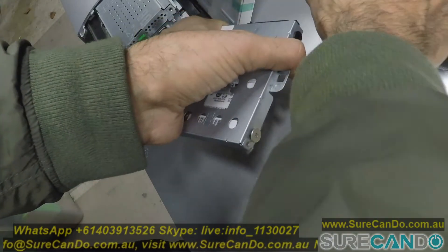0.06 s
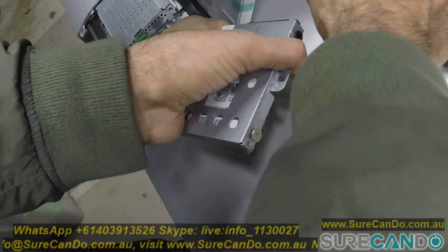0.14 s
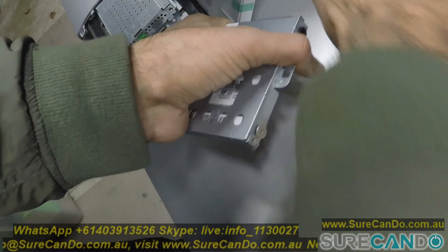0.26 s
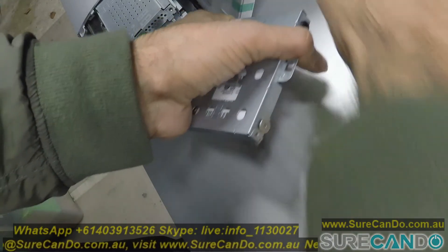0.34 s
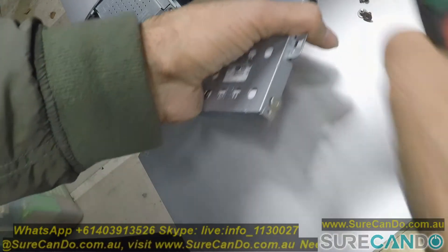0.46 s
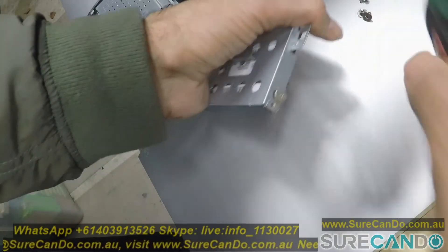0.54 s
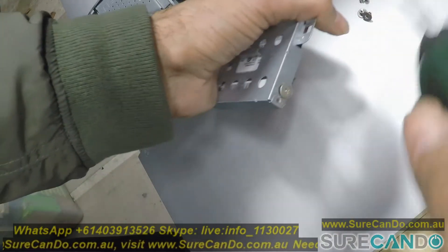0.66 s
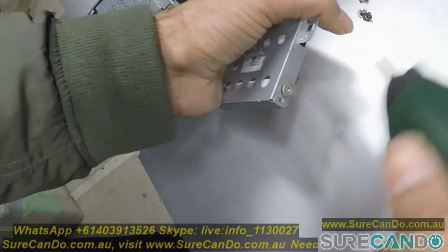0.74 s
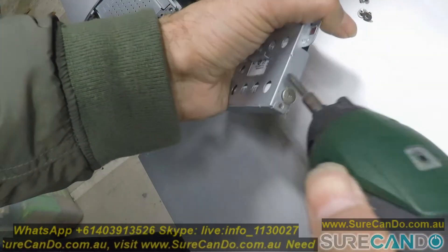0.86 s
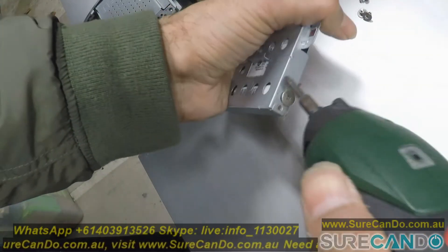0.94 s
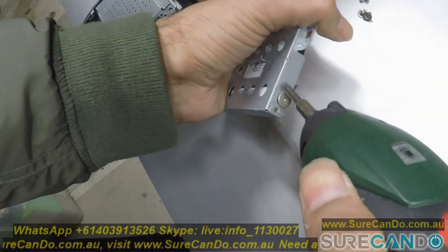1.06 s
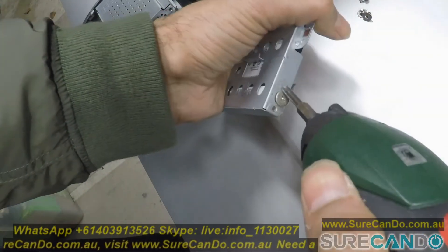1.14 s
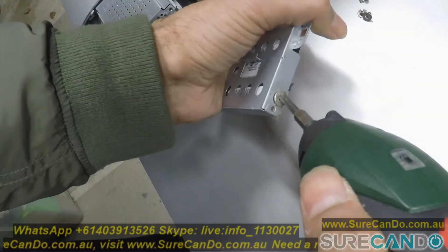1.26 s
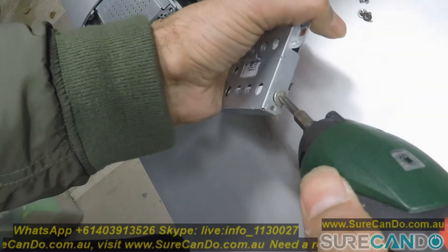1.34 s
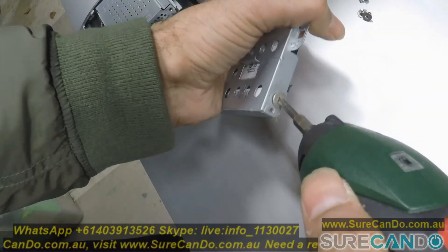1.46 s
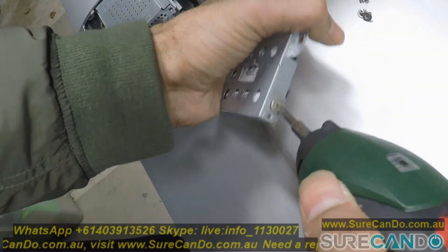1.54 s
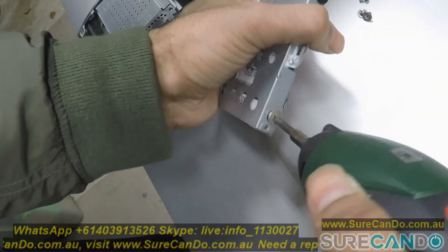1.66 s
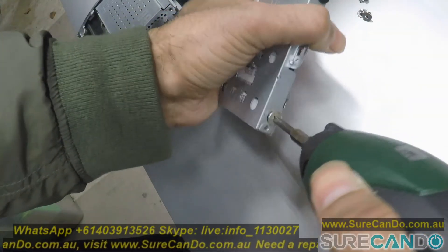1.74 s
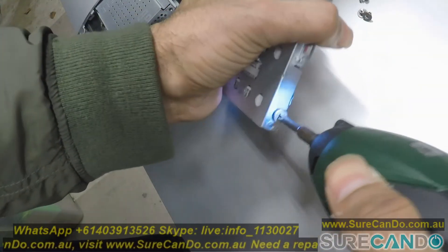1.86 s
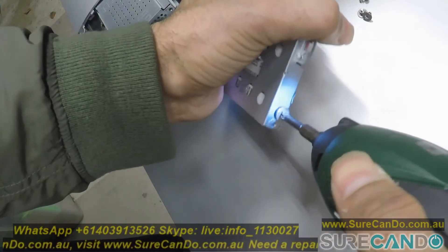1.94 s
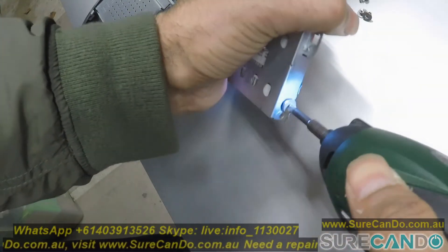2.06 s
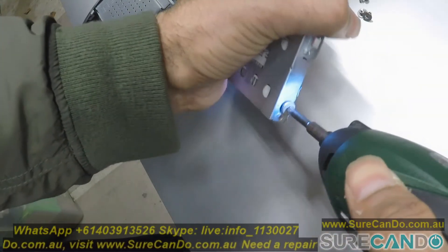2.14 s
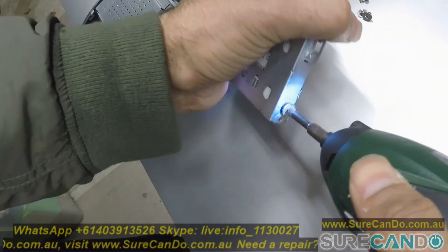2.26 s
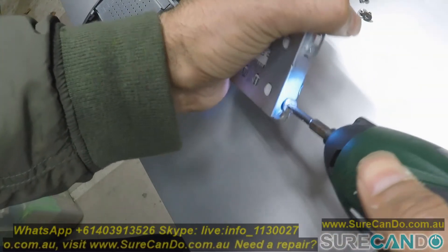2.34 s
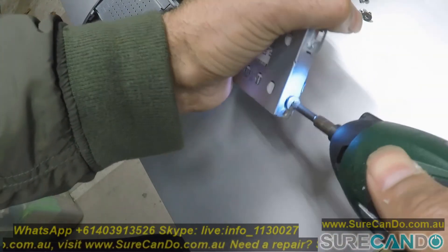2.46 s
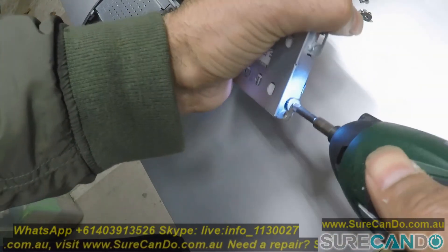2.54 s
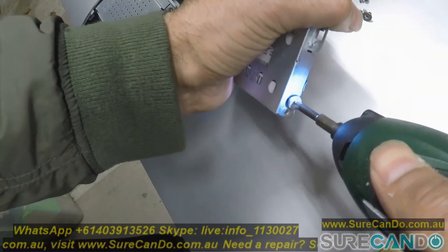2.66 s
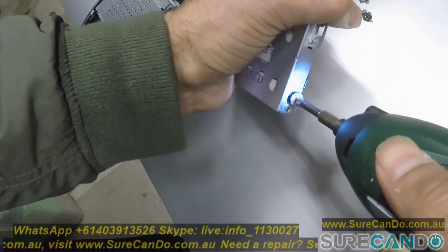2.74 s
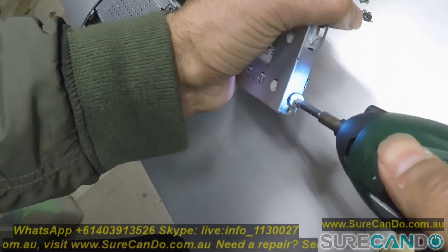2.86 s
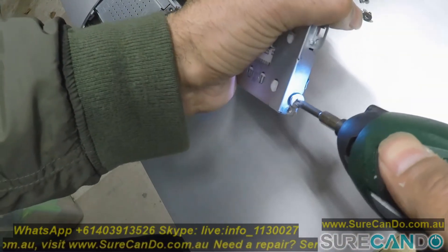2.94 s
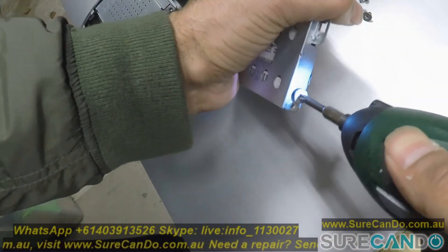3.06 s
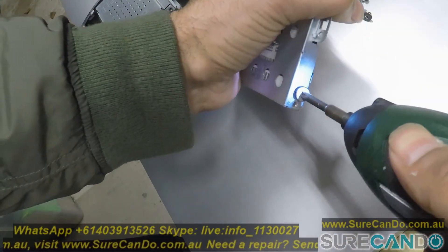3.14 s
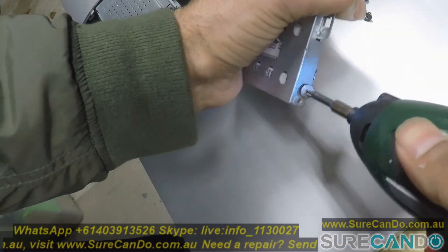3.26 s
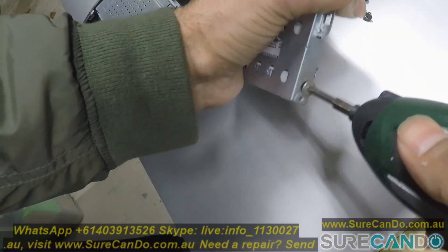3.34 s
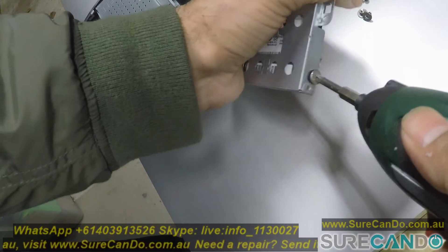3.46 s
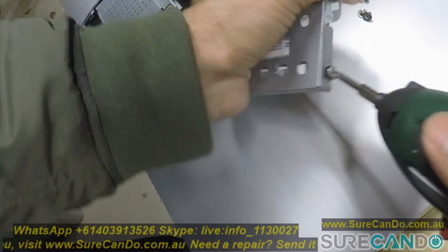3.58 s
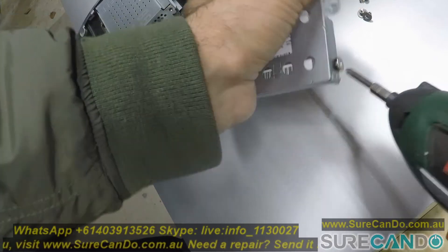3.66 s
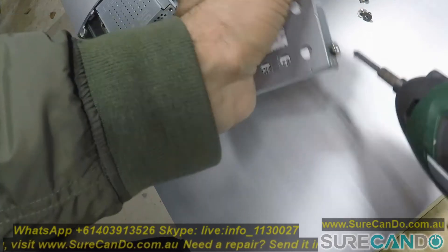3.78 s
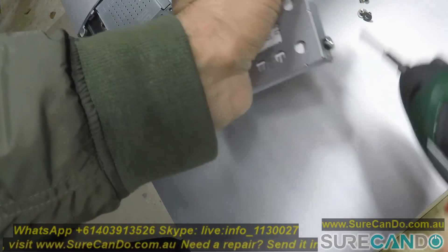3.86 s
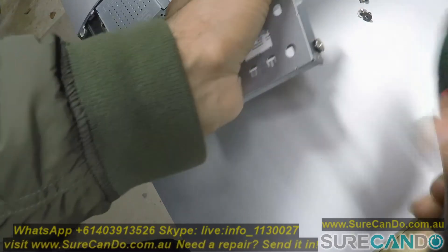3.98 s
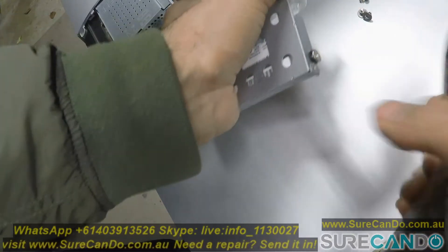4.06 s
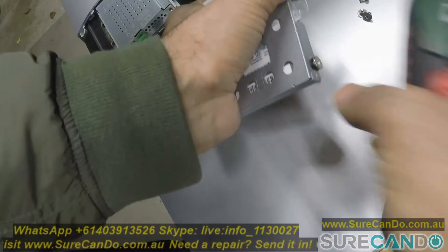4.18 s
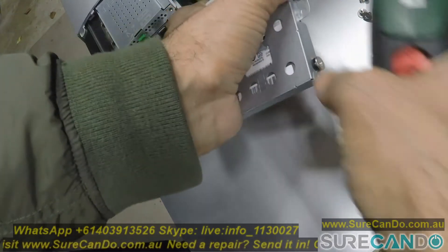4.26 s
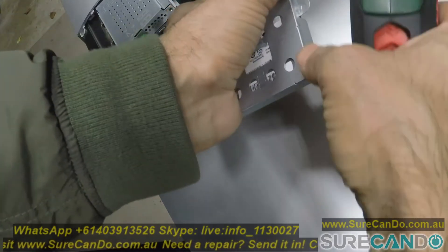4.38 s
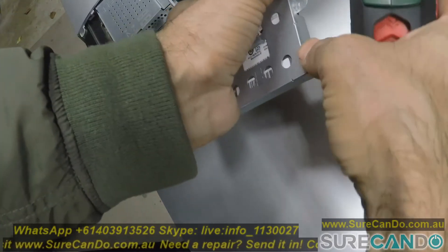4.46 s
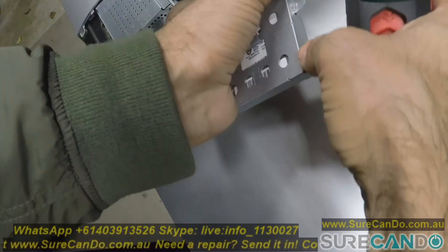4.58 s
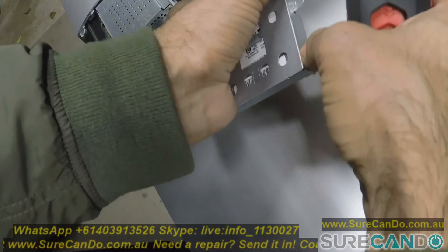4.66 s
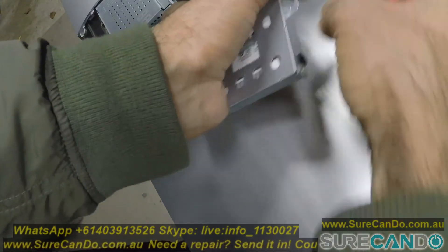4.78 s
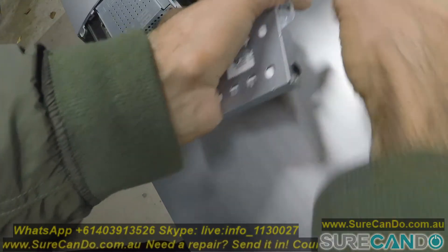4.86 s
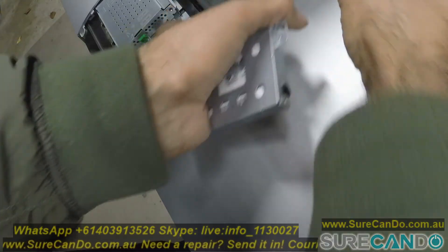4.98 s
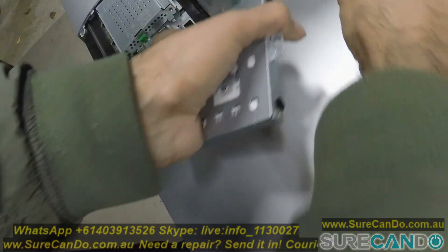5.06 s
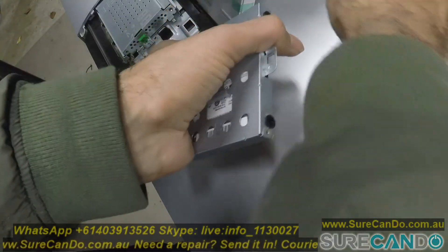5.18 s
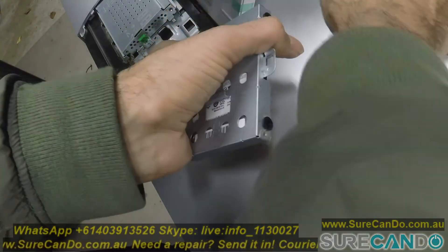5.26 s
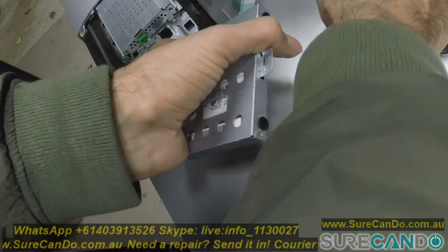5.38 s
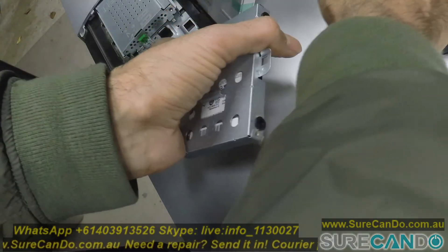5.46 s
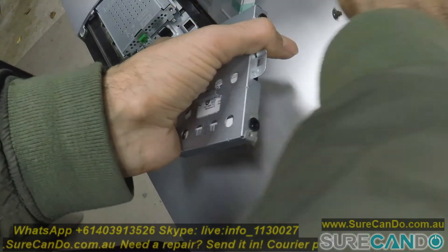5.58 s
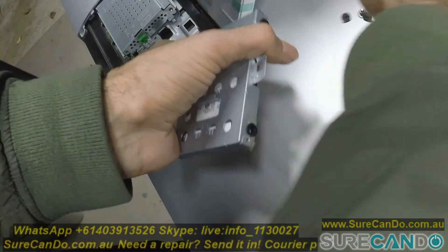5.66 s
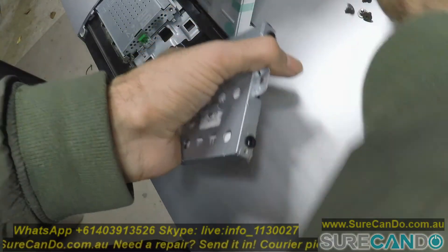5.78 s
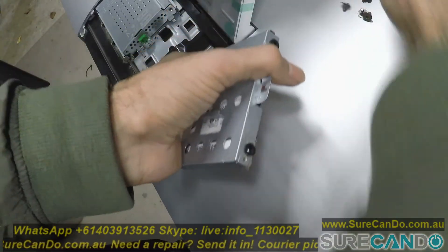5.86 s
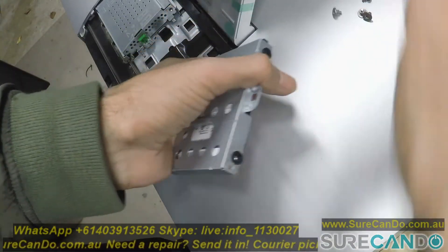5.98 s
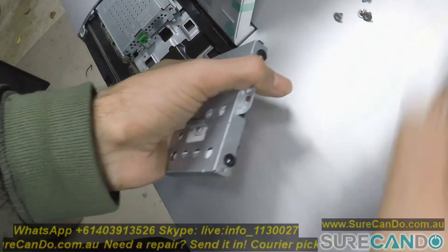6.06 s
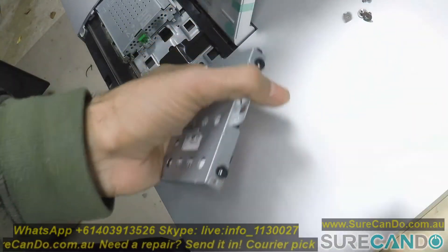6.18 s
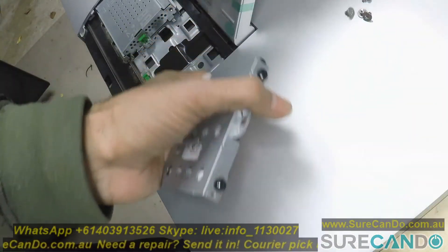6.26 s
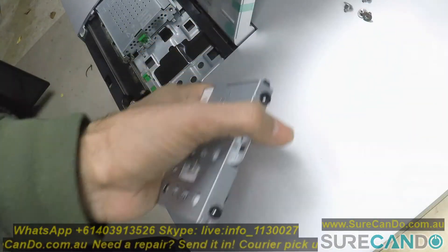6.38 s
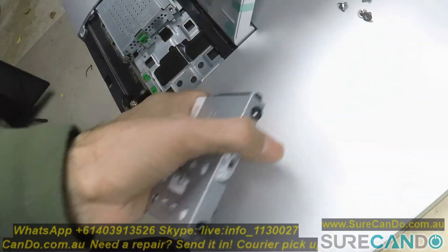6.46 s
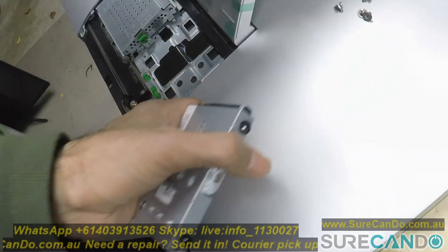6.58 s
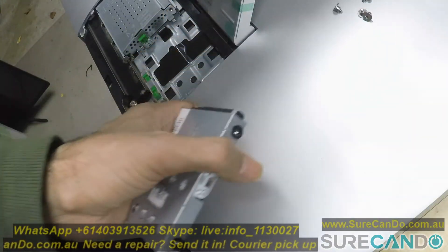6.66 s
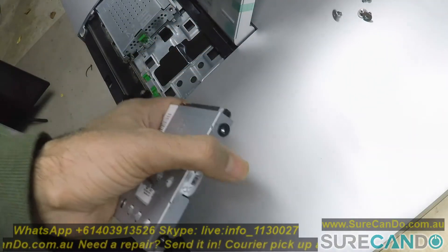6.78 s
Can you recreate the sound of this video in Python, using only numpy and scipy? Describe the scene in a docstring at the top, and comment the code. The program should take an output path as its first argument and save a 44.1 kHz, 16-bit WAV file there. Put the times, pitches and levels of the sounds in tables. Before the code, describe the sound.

Sleeve rustle and small metal taps, one buzzing burst of a handheld power screwdriver winding down, then a hard clack on the bench and light handling.

```python
"""Small workroom: a cordless screwdriver backs a screw out of a hand-held steel bracket, close by.
The bit taps and snaps into the screw head (noise bursts ringing the steel); the motor spins up, and one
simulated shaft drives gear clacks, hum and whine until it coasts to a stop. A faint resonant hiss follows
(filtered noise), sleeves rustle (patchy noise), a hard part clatters on the booming bench, and the bracket is
turned in the hand (knocks, finger hiss). Bench rumble, soft bumps and quiet room air lie beneath."""
import sys
import numpy as np
from scipy import signal
from scipy.fft import rfft, irfft
from scipy.io import wavfile
from scipy.ndimage import uniform_filter1d, map_coordinates

SR = 44100
rng = np.random.default_rng(int(sys.argv[2]) if len(sys.argv) > 2 else 0)


def wav_out(sig):
    """Save sig, one row per channel (or a flat mono array), as 16-bit PCM at SR to the path in sys.argv[1]."""
    wavfile.write(sys.argv[1], SR, np.round(np.clip(np.atleast_2d(sig).T, -1, 1) * 32767).astype(np.int16))


N = 300762
TIME = np.arange(N) / SR

# trigger pressed and released
ON_S, OFF_S = 1.843, 3.263
# free-running motor speed [turns/s]; time in which the tight screw works loose
FREE_HZ, LOOSEN_S = 291.8, .25
# resonance of the motor body
BODY_HZ, BODY_WIDTH_HZ = 980, 200
# gearbox shell, relative response: (frequency [Hz], level [dB])
SHELL = [(100, -25), (400, -25), (750, -16), (980, -9.5), (1300, -13), (1600, -12), (1800, -12.5),
         (2250, -2.5), (2700, -3.5), (4500, -1.5), (7800, 2.5), (9500, -1), (11500, -6), (16000, -13)]
# bench top modes, relative: (frequency [Hz], level [dB], t60 [s])
BENCH = [(199, -6, 0.22), (313, 3, 0.12), (382, 2.5, 0.071), (434.6, -3.5, 0.12), (513, 3.5, 0.088),
         (595, -0.5, 0.15), (724, -6, 0.16), (800, 5.5, 0.077), (940, 5.5, 0.07), (1540, -3, 0.088),
         (1910, -15.5, 0.18)]


def amp(db):
    """Decibels to gain."""
    return np.exp(np.asarray(db) * np.log(10) / 20)


def unit(x):
    """Scale to rms 1."""
    return x / np.sqrt(np.mean(x ** 2) + 1e-20)


def walk(rate_hz):
    """Smooth random drift of rms 1, aiming at rate_hz new values a second."""
    count = int(SR / rate_hz)
    steps = np.repeat(rng.standard_normal(N // count + 1), count)
    return unit(uniform_filter1d(steps, count)[:N])


def since(s):
    """Seconds gone by after a moment; zero before it."""
    return np.maximum(TIME - s, 0)


def swell(middle_s, half_length_s):
    """A stroke of the arm speeds up and slows down again."""
    return np.exp(-((TIME - middle_s) / half_length_s) ** 2)


def grit(spread_db):
    """Noise of many tiny impacts, a few much harder than the rest."""
    hardness = np.minimum(rng.exponential(size=N), 5)
    return rng.standard_normal(N) * amp(spread_db * hardness)


def colour(x, points):
    """Causal minimum-phase filter of unit power gain through (frequency [Hz], level [dB]) points."""
    size = 8192
    hz, db = np.transpose(points)
    log_hz = np.log(np.fft.rfftfreq(size, 1 / SR) + 1)
    log_gain = np.log(amp(np.interp(log_hz, np.log(hz), db)))
    cepstrum = irfft(log_gain)[:size // 2]
    cepstrum[1:] *= 2
    response = irfft(np.exp(rfft(cepstrum, size)))[:size // 2]
    return signal.fftconvolve(x, response / np.linalg.norm(response))[:len(x)]


def band(x, hz, width_hz):
    """One resonance, gain 1 at its centre."""
    return signal.lfilter(*signal.iirpeak(hz, hz / width_hz, fs=SR), x)


def ring(x, modes):
    """Drive decaying modes (frequency [Hz], level [dB], t60 [s]) at unit power gain."""
    t = TIME[:SR // 2]
    response = sum(amp(db - 60 * t / t60_s) * np.sin(2 * np.pi * hz * t) for hz, db, t60_s in modes)
    return signal.fftconvolve(x, response / np.linalg.norm(response))[:len(x)]


def resonate(x, peaks, shift_db=2.5, rate_hz=14):
    """Resonances (frequency [Hz], width [Hz], level [dB]), total power kept; each level drifts."""
    y = sum(amp(db + shift_db * walk(rate_hz)) * band(x, hz, width_hz) for hz, width_hz, db in peaks)
    return y * np.std(x) / np.std(y)


def wander(x, share, rate_hz):
    """Let all pitches stray together by about this share."""
    return np.interp(TIME + share / rate_hz * walk(rate_hz), TIME, x)


def patchy(x, low_hz, high_hz, spread_db, rate_hz):
    """Each third of an octave swells and fades on its own, as folds open and close."""
    centres_hz = np.geomspace(low_hz, high_hz, 15)
    return sum(band(x, hz, hz / 6) * amp(spread_db * walk(rate_hz)) for hz in centres_hz)


def contact(length_s, rise_s=0.00027):
    """A hard contact chatters: a burst of tiny impacts that dies away."""
    t = TIME[:SR // 4]
    return rng.standard_normal(len(t)) * (1 - np.exp(-t / rise_s)) * np.exp(-t / length_s)


def place(x, s, db):
    """Set a short sound at its time; its level is its energy spread over 10 ms."""
    gain = amp(db) * np.sqrt(SR / 100) / np.linalg.norm(x)
    return np.pad(x * gain, (int(s * SR), N))[:N]


def room(x, t60_low_s=0.31, t60_high_s=0.24, treble_db=-2):
    """Bench and near walls answer from 3 ms on as decaying noise; the treble dies faster."""
    t = TIME[:SR // 2]
    noise = rng.standard_normal(len(t)) * (t > .003)
    low = signal.sosfilt(signal.butter(3, 4000, fs=SR, output="sos"), noise)
    high = signal.sosfilt(signal.butter(3, 4000, "highpass", fs=SR, output="sos"), noise)
    response = low * amp(-60 * t / t60_low_s) + high * amp(treble_db - 60 * t / t60_high_s)
    return signal.fftconvolve(x, response / np.linalg.norm(response))[:N]


def background(rumble_floor_db=-59.5, air_db=-70.5):
    """The bench rumbles as the arms lean and takes soft bumps, over the quiet air of the room."""
    # soft bumps, damped sines: (time [s], level [dB], pitch [Hz], length [s])
    bump_table = [(2.082, -38, 55.3, 0.019), (3.609, -41.5, 124, 0.012), (3.66, -43.5, 148, 0.014),
                  (3.771, -37, 61.3, 0.013), (3.94, -37.5, 64, 0.011), (4.309, -37, 51, 0.0066),
                  (4.552, -41.5, 51, 0.012), (5.208, -46, 119.3, 0.0039), (5.283, -34, 91, 0.0053),
                  (5.302, -35.5, 124, 0.0046), (5.352, -39, 109, 0.0076), (5.592, -40.5, 56.6, 0.0082),
                  (5.766, -40.5, 57, 0.0088), (6.104, -34, 57.7, 0.012)]
    # arms lean and shift: (middle [s], half length [s], level [dB])
    lean_table = [(0.306, 0.17, -58), (2.148, 0.14, -54), (3.551, 0.82, -48.5), (4.793, 0.26, -59),
                  (5.855, 0.34, -55), (6.7, 0.17, -56.5)]
    # rumble spectrum: (frequency [Hz], level [dB])
    rumble_colour = [(15, -3.5), (25, 7), (38, -9), (52, -2.5), (68, 6.5), (85, -13.5), (130, -20),
                     (250, -32.5), (600, -77.5)]
    # room air spectrum: (frequency [Hz], level [dB])
    air_colour = [(100, 0), (350, -12), (600, -17.5), (1100, -17), (2400, -19.5), (3500, -32), (6000, -42),
                  (16000, -48)]
    t = TIME[:SR // 3]
    bumps = sum(place(t * np.exp(-t / length_s) * np.sin(2 * np.pi * hz * t), s, db)
                for s, db, hz, length_s in bump_table)
    leaning = sum(amp(db) * swell(s, half_length_s) for s, half_length_s, db in lean_table)
    rumble = unit(colour(rng.standard_normal(N), rumble_colour)) * (amp(rumble_floor_db) + leaning)
    air = unit(colour(rng.standard_normal(N), air_colour)) * amp(air_db)
    return bumps + rumble + air


def sleeves(flap_trim_db=-3, bench_trim_db=-7, rub_trim_db=-1):
    """Heavy cloth drags softly over the bench top, and its weave swishes as it slides."""
    # strokes, levels before trim: (middle [s], half length [s], drag on bench [dB], rubbing hiss [dB])
    stroke_table = [(0.0, 0.049, -43.5, -55), (0.169, 0.057, -47.5, -62), (0.357, 0.13, -60.5, -68.5),
                    (0.488, 0.048, -62.5, -62.5), (0.613, 0.087, -59.5, -66), (0.676, 0.23, -61, -84),
                    (3.89, 0.066, -84, -62), (3.972, 0.041, -77, -59.5), (4.055, 0.052, -62, -54),
                    (4.876, 0.042, -58, -57.5), (4.969, 0.084, -67.5, -48.5), (5.092, 0.17, -58.5, -63),
                    (5.62, 0.15, -49, -89), (5.897, 0.13, -53.5, -64.5), (6.118, 0.1, -51.5, -52.5),
                    (6.324, 0.078, -54, -52), (6.522, 0.076, -50.5, -49), (6.63, 0.089, -60, -60),
                    (6.791, 0.031, -57, -42)]
    # dragging cloth spectrum: (frequency [Hz], level [dB])
    flap_colour = [(130, -10.5), (190, -10.5), (300, -1.5), (510, 7.5), (700, -1), (900, 2.5), (1100, -5),
                   (1450, -7), (2050, -12.5), (2600, -11), (3300, -21.5), (6000, -45)]
    # rubbing weave spectrum: (frequency [Hz], level [dB])
    rub_colour = [(500, -7.5), (800, 2), (1050, -5), (1400, 3), (2200, 2), (3300, 1.5), (4200, -1),
                  (5200, -8), (6500, -5), (7900, -3), (9800, -17), (16000, -30.5)]
    drag_level = sum(amp(drag_db) * swell(s, half_length_s)
                     for s, half_length_s, drag_db, _ in stroke_table)
    rub_level = sum(amp(hiss_db + rub_trim_db) * swell(s, half_length_s)
                    for s, half_length_s, _, hiss_db in stroke_table)
    drag = colour(rng.standard_normal(N) * amp(2.2 * walk(70)), flap_colour)
    drag = patchy(drag, 130, 3300, spread_db=3.6, rate_hz=24)
    weave = colour(grit(2.2) * amp(2 * walk(170)), rub_colour)
    weave = patchy(weave, 550, 14000, spread_db=2.5, rate_hz=24)
    cloth = amp(flap_trim_db) * unit(drag) + amp(bench_trim_db) * unit(ring(drag, BENCH))
    return drag_level * cloth + rub_level * unit(weave)


def knocks():
    """Small parts, tool and bracket knock and scuff in the hands: doubly band-passed contacts."""
    # levels before the colour: (time [s], level [dB], pitch [Hz], length [s])
    knock_table = [(0.142, -54, 2170, 0.015), (0.153, -58, 5800, 0.0093), (0.159, -51, 2250, 0.0038),
                   (0.167, -46, 1530, 0.0053), (0.203, -46.5, 1630, 0.0041), (0.334, -51, 187, 0.085),
                   (0.419, -57, 497, 0.0069), (0.58, -46.5, 1700, 0.004), (1.824, -46, 9400, 0.0021),
                   (3.595, -37, 1260, 0.02), (3.606, -35, 135, 0.068), (3.805, -72, 5000, 0.0018),
                   (3.839, -63, 4870, 0.0027), (4.02, -42.5, 1920, 0.0033), (4.154, -55, 4800, 0.0025),
                   (5.703, -61, 493, 0.0067), (6.159, -51.5, 7000, 0.0016), (6.325, -45.5, 1640, 0.003),
                   (6.423, -56.5, 610, 0.0049), (6.443, -54, 880, 0.0041), (6.474, -53.5, 754, 0.0021),
                   (6.492, -57.5, 3600, 0.0022), (6.521, -39.5, 1670, 0.0023), (6.539, -39.5, 4900, 0.0029),
                   (6.567, -53, 5500, 0.004), (6.754, -46, 1410, 0.059)]
    # short resonances of hand-damped metal and plastic: (frequency [Hz], level [dB])
    knock_colour = [(100, -8), (400, 1.5), (620, 7), (850, 0.5), (1100, -1), (1400, -4), (1700, -3),
                    (2250, 1), (2700, -6.5), (3200, 1.5), (4500, -4), (8000, 1), (11000, -11)]
    blows = sum(place(band(band(contact(length_s), hz, 1.07 * hz), hz, 1.07 * hz), s, db)
                for s, db, hz, length_s in knock_table)
    return colour(blows, knock_colour)


def taps():
    """The bit feels for the screw head: slow-rising contacts."""
    # (time [s], level [dB], length [s])
    tap_table = [(1.07, -41.5, 0.0034), (1.107, -59, 0.0044), (1.301, -33.5, 0.0026), (1.352, -36, 0.0026),
                 (1.4165, -59.5, 0.0021)]
    # tap spectrum: (frequency [Hz], level [dB])
    tap_colour = [(500, -41.5), (1300, -16.5), (1850, 4.5), (2300, -4.5), (3000, -4.5), (3700, -8),
                  (5200, -12.5), (6600, -9), (7800, -17), (9500, -38.5), (11500, -40), (12700, -47),
                  (14500, -42), (16000, -47)]
    return sum(place(colour(contact(length_s, rise_s=0.0021), tap_colour), s, db)
               for s, db, length_s in tap_table)


def snaps():
    """Bit, trigger and spindle lock snap home: contacts through one broad resonance each."""
    # (time [s], level [dB], pitch [Hz], length [s])
    snap_table = [(1.707, -19, 4150, 0.0024), (1.86, -23, 1710, 0.0085), (2.337, -20.5, 2200, 0.003)]
    # snap spectrum: (frequency [Hz], level [dB])
    snap_colour = [(200, -25.5), (600, -6), (1050, -1), (1450, -3.5), (1800, 0), (2150, -5.5), (2700, -1),
                   (3200, -10.5), (3700, -1), (6200, -5), (7300, 2), (9300, -16), (12000, -12.5),
                   (16000, -20.5)]
    return sum(place(band(colour(contact(length_s, rise_s=0.0007), snap_colour), hz, 2 * hz), s, db)
               for s, db, hz, length_s in snap_table)


def metalwork(tap_ring_db=-24, snap_ring_db=-25, knock_ring_db=-18):
    """Knocks, taps and snaps; each sets the hand-damped bracket ringing a little."""
    # steel bracket modes, relative: (frequency [Hz], level [dB], t60 [s])
    bracket = [(1070, -8, .1), (1800, -7, .11), (1900, -10, .11), (2374, -8, .2), (2860, -5, .25),
               (3542, -2, .2), (3650, -3, .2), (4134, -7, .25), (4570, -6, .14), (5103, -6, .25),
               (5360, -5, .14), (6288, -6, .2), (6600, -12, .45), (6912, -2, .16), (7251, -6, .14),
               (7838, -11, .16), (11610, -18, .2)]
    knock, tap, snap = knocks(), taps(), snaps()
    drive = amp(tap_ring_db) * tap + amp(snap_ring_db) * snap + amp(knock_ring_db) * knock
    return knock + tap + snap + ring(drive, bracket)


def motor_speed(spin_up_s=.025, load_sag_hz=29, brake_hz_per_s=236, grease_s=.5):
    """Turns a second: inertia delays the start, the tight screw holds back; friction and grease stop it."""
    driven = FREE_HZ * (1 - np.exp(-since(ON_S) / spin_up_s))
    driven = driven - load_sag_hz * np.exp(-since(ON_S) / LOOSEN_S)
    # dry friction slows it steadily, grease in proportion to speed
    kept = np.exp(-since(OFF_S) / grease_s)
    return np.maximum(driven * kept - brake_hz_per_s * grease_s * (1 - kept), 0)


def disperse(x, stages=3, lag_s=.00031, feedback=.62):
    """Reflections in the shell draw a click out, the same way every time, uncoloured (all-pass chain)."""
    for k in range(stages):
        gap = np.zeros(int(lag_s * SR * 1.6 ** k))
        x = signal.lfilter(np.r_[-feedback, gap, 1], np.r_[1, gap, -feedback], x)
    return x


def clacks(turns, scatter_db=1.5, wobble_db=1.5, tick_db=12.5, rebound_db=14.5, chatter_db=-2,
           decay_s=.0017, loose_db=-11, jitter_turns=.008, grit_db=2.4):
    """Planet gears slap through their backlash: tick, fixed rebound, short chatter; loose teeth rattle."""
    count = int(turns[-1]) + 2
    chance = rng.standard_normal((count, 2)).clip(-2, 2)
    cycle = turns.astype(int)
    # the second gear stage comes round once in 16 slaps and leans on the first
    lean = np.sin(2 * np.pi * np.arange(count) / 16)
    force = amp(scatter_db * chance[:, 0] + wobble_db * lean)[cycle]
    late = turns - jitter_turns * np.interp(turns, np.arange(count), chance[:, 1])
    ticks = np.diff(np.floor(late), prepend=0).clip(0, 1)
    age_s = TIME - np.maximum.accumulate(TIME * ticks)
    rebound = band(disperse(ticks), hz=4200, width_hz=6000)
    chatter = np.exp(-age_s / decay_s) * rng.standard_normal(N)
    slaps = force * (amp(tick_db) * ticks + amp(rebound_db) * rebound + amp(chatter_db) * chatter)
    slaps = slaps + amp(loose_db) * unit(grit(grit_db))
    # rms 1 while the trigger is held
    return slaps / np.std(slaps[(TIME > ON_S) & (TIME < OFF_S)])


def soften(x, share, corner_hz=8500):
    """Slower slaps are duller: the top of the treble shrinks to this share."""
    dull = signal.sosfiltfilt(signal.butter(3, corner_hz, fs=SR, output="sos"), x)
    return dull + share * (x - dull)


def rattle(planets, screw_turns, speed_share, drive_db=-23.5, shell_db=-1.0, housing_db=-13,
           grind_db=-7, load_db=4.0, take_up_s=.045):
    """Slaps ring the shell, harder with speed and load; via the bit the screw rasps in the bracket."""
    # narrow gear housing resonances, relative: (frequency [Hz], width [Hz], level [dB])
    housing = [(3260, 70, -2), (3640, 100, -1), (4230, 170, -6), (4730, 130, -6), (5710, 160, -2),
               (6800, 90, 0), (7570, 90, -1), (7860, 150, 0), (8890, 180, -2), (9730, 250, -6)]
    # bracket with the screw turning in it, relative: (frequency [Hz], width [Hz], level [dB])
    grind = [(1010, 200, -10), (1750, 130, -.5), (1885, 110, 1), (2520, 240, -1), (2780, 220, -2),
             (3620, 200, -5)]
    # the gears take up the load, heaviest until the screw works loose
    engaged = (1 - np.exp(-since(ON_S) / take_up_s)) * amp(load_db * np.exp(-since(ON_S) / LOOSEN_S))
    force = amp(drive_db) * speed_share * engaged
    slaps = soften(clacks(planets), np.sqrt(speed_share)) * force
    shell_ring = amp(shell_db) * colour(slaps, SHELL)
    # resonance levels drift as the grip shifts
    housing_ring = amp(housing_db) * wander(resonate(slaps, housing), share=.003, rate_hz=9)
    jolts = clacks(planets, scatter_db=2, tick_db=10, rebound_db=14, decay_s=.0025, jitter_turns=.03)
    thread = wander(resonate(jolts, grind, shift_db=1.5), share=.008, rate_hz=14) * force
    # the screw binds once a turn, first at 2.035 s; the rasp fades as the thread comes out
    binding = np.cos(2 * np.pi * (screw_turns - np.interp(2.035, TIME, screw_turns)))
    bind_db, fade_db_per_s, flutter_db = 2, 6, 1.5
    rasp_db = grind_db + bind_db * binding - fade_db_per_s * since(ON_S) + flutter_db * walk(25)
    return shell_ring + housing_ring + amp(rasp_db) * thread


def partials(turns, orders, waver_db, rate_hz):
    """Wavering sines on (multiple of shaft speed, level [dB]) of a turning shaft."""
    return sum(amp(db + waver_db * walk(rate_hz)) * np.sin(2 * np.pi * (k * turns + rng.random()))
               for k, db in orders)


def tones(turns, planets, speed_share, hum_trim_db=-2.5, whine_trim_db=-2, coast_trim_db=-11,
          body_db=7, rise_s=.06, cut_s=0.04, shake_turns=.006):
    """Powered, the rotor hums and teeth whine; coasting, an unsteady whine sweeps down past the body."""
    # rotor hum before trim: (multiple of motor speed, level [dB])
    hum_orders = [(1, -44), (2, -47), (3, -43.5), (4, -40.5), (5, -43), (6, -54.5), (7, -51.5), (9, -51)]
    # gear whine before trim: (multiple of planet passing rate, level [dB])
    whine_orders = [(4, -55.5), (6, -53), (7, -52), (9, -47), (10, -48), (11, -45.5), (16, -46.5),
                    (17, -45.5)]
    # coasting whine before trim: (multiple of motor speed, level [dB])
    coast_orders = [(3, -43), (4, -40), (6, -35.5)]
    coasting = 1 - np.exp(-since(OFF_S) / cut_s)
    current = (1 - np.exp(-since(ON_S) / rise_s)) * (1 - coasting)
    # the gear slaps shake the rotor
    shaken = turns + shake_turns * walk(150)
    hum = partials(shaken, hum_orders, waver_db=1.5, rate_hz=60)
    whine = partials(planets, whine_orders, waver_db=5.0, rate_hz=43)
    coast = partials(shaken + .002 * walk(200), coast_orders, waver_db=2.2, rate_hz=50)
    # loudest at half speed
    coast = coast * coasting * (4 * speed_share * (1 - speed_share)) ** 6
    coast = coast + amp(body_db) * band(coast, BODY_HZ, BODY_WIDTH_HZ)
    # magnetic pull follows the current squared, tooth load the current itself
    powered = current ** 2 * amp(hum_trim_db) * hum + current * amp(whine_trim_db) * whine
    return powered + amp(coast_trim_db) * coast


def freewheel(speed_share, teeth_db=-38, body_db=-42, release_s=.03, power=.7):
    """Load gone, the gears float in their play: a dense chatter that also rings the motor body."""
    floating = (1 - np.exp(-since(OFF_S) / release_s)) * speed_share ** power
    teeth = grit(1.5) * amp(3.2 * walk(250))
    chatter = unit(colour(teeth, [(200, -12.0), (700, 4), (1500, 3.5), (4500, -3.0), (7500, -9),
                                  (10000, -43), (16000, -38)]))
    body = unit(band(chatter, BODY_HZ, BODY_WIDTH_HZ))
    return floating * (amp(teeth_db) * chatter + amp(body_db) * speed_share * body)


def catches(length_s=.0006):
    """Single teeth catch as the motor runs down and stops, ticking against the shell."""
    # (time [s], level [dB])
    catch_table = [(3.339, -32), (3.362, -28), (3.388, -29.5), (3.443, -34), (3.487, -32.5), (3.532, -33.5),
                   (3.567, -37), (3.584, -39), (3.6, -32), (3.608, -29), (3.727, -42.5), (3.766, -43.5)]
    return sum(place(colour(contact(length_s, rise_s=.00005), SHELL), s, db) for s, db in catch_table)


def bench_echo(x, echo_db=-14):
    """An inverted near reflection combs the sound; notches glide as the tool settles on the screw."""
    # delay of the reflection off the bench: (time [s], delay [s])
    lag_table = [(1.9, .00134), (2.2, .00128), (2.9, .001266), (3.5, .00124)]
    lag_s = np.interp(TIME, *np.transpose(lag_table))
    return x - amp(echo_db) * map_coordinates(x, [(TIME - lag_s) * SR])


def screwdriver(room_db=-12, planet_ratio=.593, gear_ratio=82):
    """One shaft drives rattle and tones; planet gears and screw turn at fixed shares of its speed."""
    speed_hz = motor_speed()
    speed_share = speed_hz / FREE_HZ
    turns = np.cumsum(speed_hz * (1 + .0007 * walk(40))) / SR
    planets = turns * planet_ratio
    # gear_ratio motor turns for one turn of the screw
    gears = rattle(planets, turns / gear_ratio, speed_share) + freewheel(speed_share) + catches()
    return bench_echo(gears) + tones(turns, planets, speed_share) + amp(room_db) * room(gears)


def faint_hiss(start_s=4, hold_s=0.44, level_db=-57, fade_db_per_s=80, flutter_db=2, attack_s=0.01):
    """A faint, soft hiss with wavering resonances swells up, holds and fades: filtered noise."""
    # hiss resonances, relative: (frequency [Hz], width [Hz], level [dB])
    hiss_modes = [(535, 65, 1), (790, 270, -12.5), (1924, 92, -6), (2250, 81, -12)]
    fade_db = fade_db_per_s * since(start_s + hold_s)
    envelope = (1 - np.exp(-since(start_s) / attack_s)) * amp(level_db - fade_db)
    noise = colour(rng.standard_normal(N) * amp(flutter_db * walk(120)),
                   [(250, -28), (480, -0.5), (2500, -6), (4000, -14.0), (10000, -15)])
    hiss = resonate(noise, hiss_modes, shift_db=1.2)
    return envelope * unit(wander(hiss, share=.03, rate_hz=12))


def put_down(bench_db=-11):
    """A hard part drops on the bench and rocks with a clatter; the bench top booms."""
    # (time [s], level [dB], length [s])
    drop_table = [(5.3871, -23, 0.0083), (5.4067, -16, 0.0041), (5.429, -25, 0.0087), (5.445, -35.5, 0.007)]
    # drop spectrum: (frequency [Hz], level [dB])
    drop_colour = [(120, -13.5), (300, -2), (800, -1), (1100, -6.5), (1500, -3), (1900, -8.5), (2800, -2.5),
                   (4000, -7), (8300, -4.5), (10500, -18), (16000, -25)]
    blows = sum(place(colour(contact(length_s, rise_s=0.000068), drop_colour), s, db)
                for s, db, length_s in drop_table)
    return blows + amp(bench_db) * unit(ring(blows, BENCH)) * np.std(blows)


def fingers(trim_db=-5, catch_db=2):
    """Dry skin slides along the steel as it is turned: a fine, high, fluttering hiss."""
    # strokes, level before trim: (middle [s], half length [s], level [dB])
    finger_table = [(5.863, 0.015, -64), (6.11, 0.041, -49.5), (6.543, 0.012, -39), (6.795, 0.021, -46)]
    hiss = colour(rng.standard_normal(N), [(2000, -35.0), (8000, 4.5), (10500, -5.0), (15000, -12)])
    strokes = sum(amp(db) * swell(s, half_length_s) for s, half_length_s, db in finger_table)
    return unit(hiss) * strokes * amp(trim_db + catch_db * walk(84))


def scene(metal_room_db=-12, drop_room_db=-6, soft_room_db=-9):
    """The work is close; the part is put down further off, so more of the room is heard."""
    soft = sleeves() + faint_hiss() + fingers()
    metal = metalwork()
    drop = put_down()
    send = amp(metal_room_db) * metal + amp(drop_room_db) * drop + amp(soft_room_db) * soft
    return (background() + soft + metal + screwdriver() + drop + room(send))[None]


def record(dry, top_hz=16100):
    """Cut the top steeply with an elliptic low-pass."""
    return signal.sosfilt(signal.ellip(10, .2, 80, top_hz, fs=SR, output="sos"), dry)


dry = scene()
out = record(dry)
wav_out(out)
```